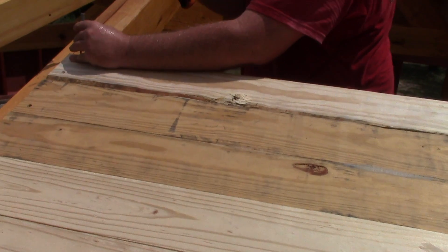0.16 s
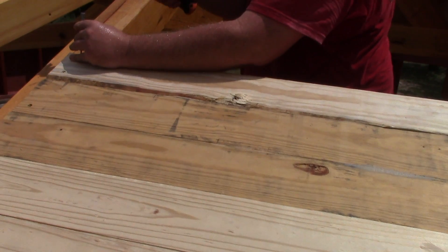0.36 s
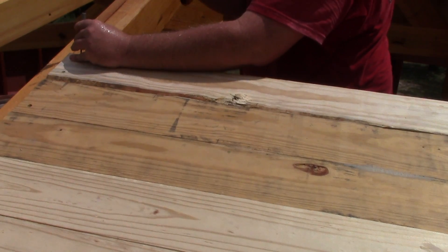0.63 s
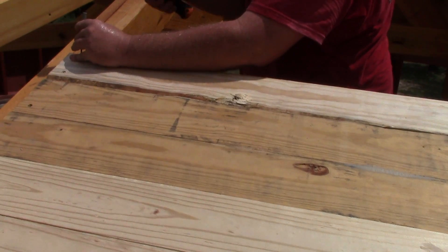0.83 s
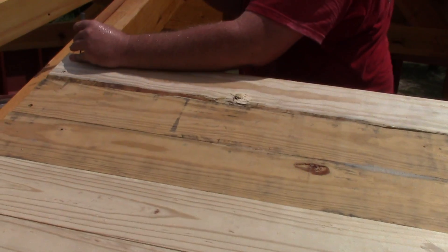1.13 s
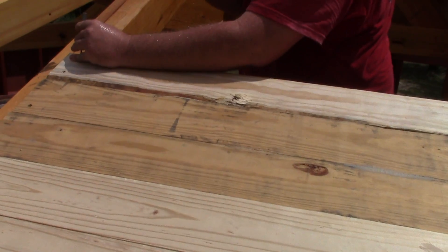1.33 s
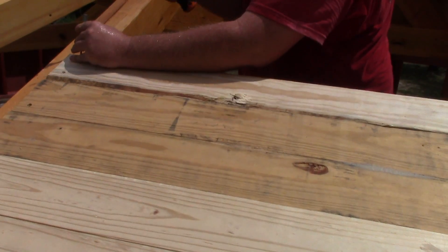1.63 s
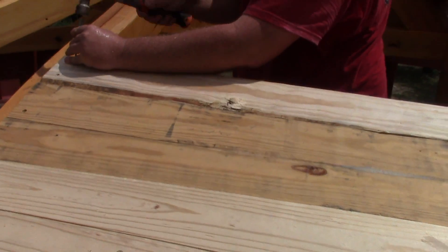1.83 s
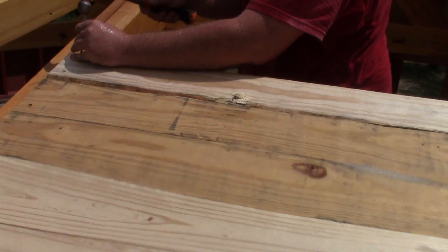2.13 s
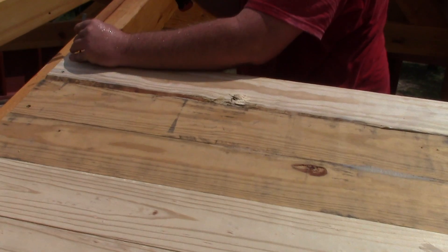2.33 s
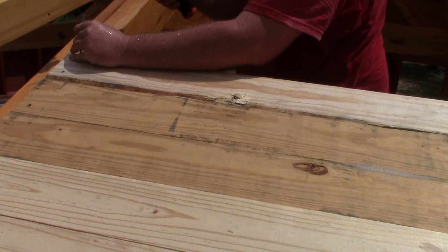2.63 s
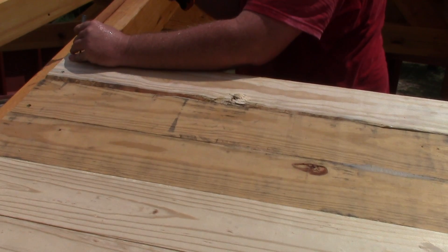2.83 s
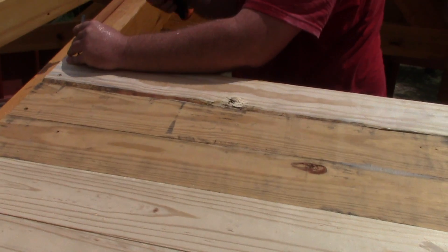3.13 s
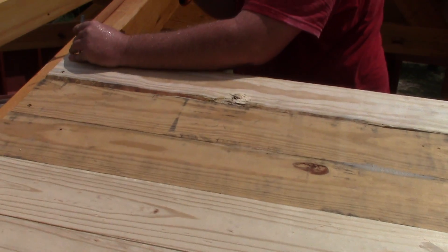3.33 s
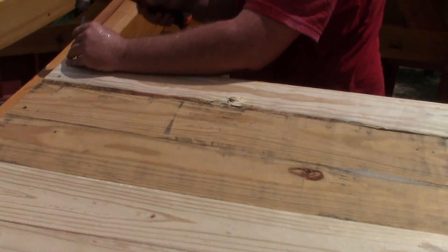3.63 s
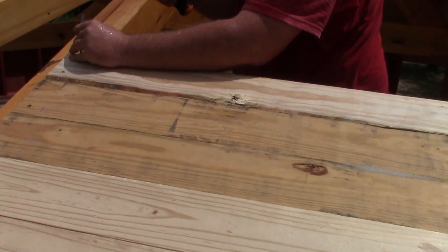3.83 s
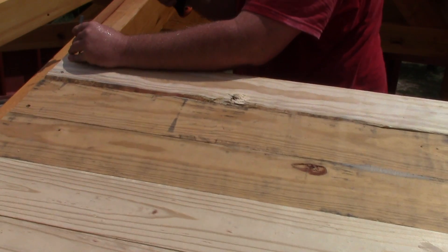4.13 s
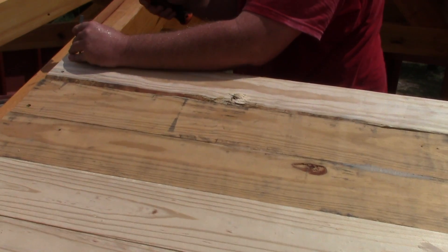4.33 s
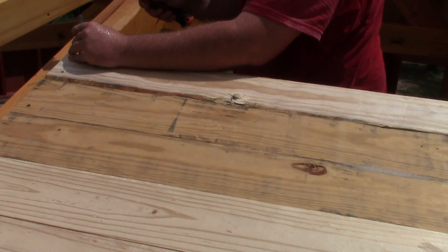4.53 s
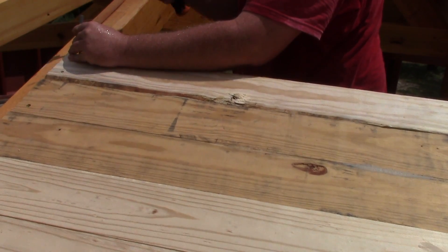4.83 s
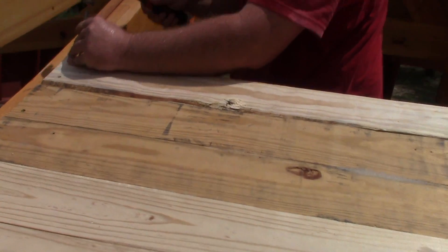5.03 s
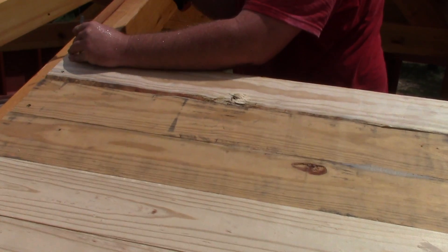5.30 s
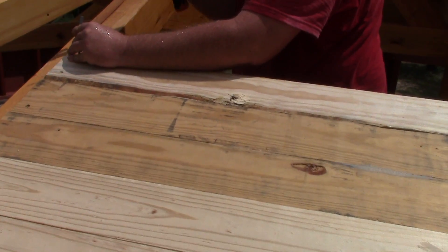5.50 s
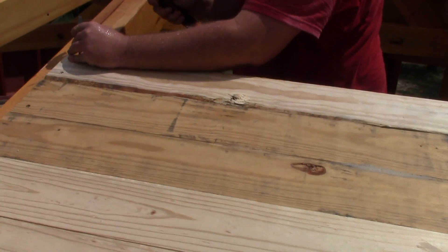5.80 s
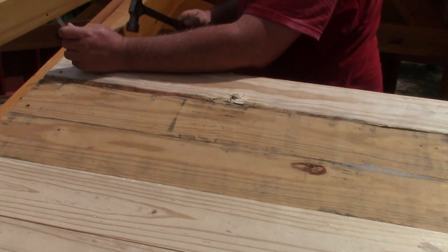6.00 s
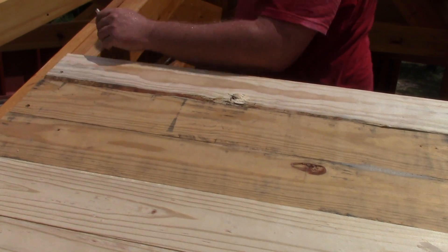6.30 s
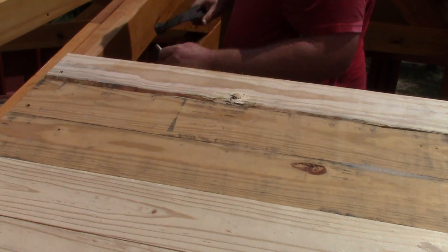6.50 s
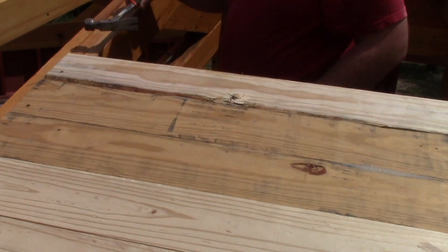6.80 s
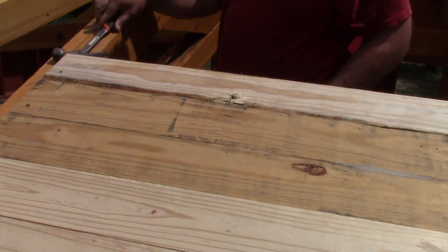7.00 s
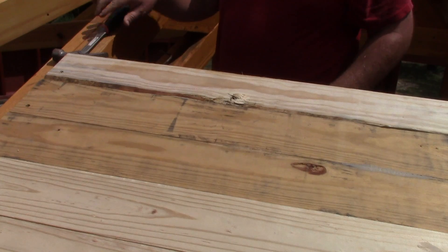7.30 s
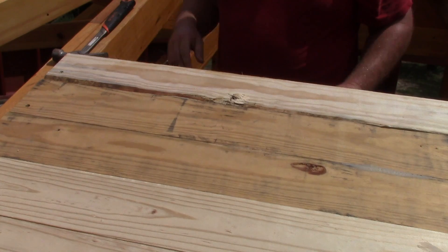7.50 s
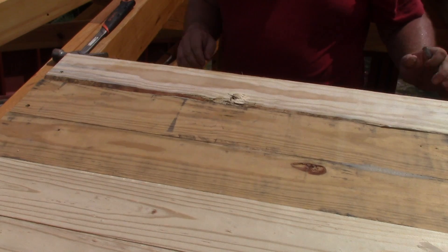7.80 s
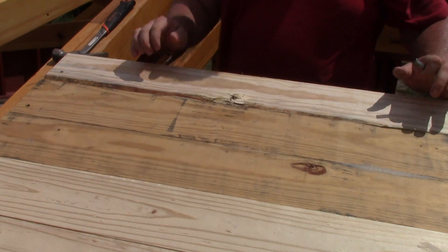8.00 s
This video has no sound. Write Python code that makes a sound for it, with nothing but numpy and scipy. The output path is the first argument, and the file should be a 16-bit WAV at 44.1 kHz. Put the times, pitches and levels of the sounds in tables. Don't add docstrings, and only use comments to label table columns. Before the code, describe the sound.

Outdoors on a wooden roof deck, close stereo microphone. A hammer blow is already ringing at the start, with a small double knock at 0.28. Hard, overloaded blows land at 0.9 and 1.5, a quick follow-up at 1.85 and a duller one at 2.15: sharp crack, hollow plank boom around 400-500 Hz, rough echoes, and a wavering steel ring at 5-7 kHz. Sound dips just after the loud hits. Light ticks come near 2.5, weaker blows at 3.05 and 3.65, a faint touch at 4.7, light blows at 5.05 and 5.7. Cicadas hiss left of centre, throbbing about 20-30 times a second, buzzier from 4 to 5.5, fading as the overall level sinks after 6, then rising abruptly at 7.74. Bird whistles: a falling one at 0.7, a rising one at 1.15, faint ones from 5.9, a rising series from 7.1 to 7.8, a chip at 8. Soft knocks at 7 and a brighter click near 7.8. Low site hum underneath.

```python
import sys
import numpy as np
from scipy import signal
from scipy.fft import rfft, irfft
from scipy.io import wavfile

SR = 44100
rng = np.random.default_rng(int(sys.argv[2]) if len(sys.argv) > 2 else 0)


def dump_mix(stems):
    frames = np.atleast_2d(stems).T
    limited = np.clip(frames, -1, 1)
    pcm = np.round(limited * 32767).astype(np.int16)
    wavfile.write(sys.argv[1], SR, pcm)


def undo_db(level):
    steps = np.asarray(level, float) / 20
    return 10 ** steps


N = 359415

# t/s, plank boom level/dB, echo level/dB, gain dip after the overload/dB
BLOWS = [
    (-.042, -15, -14, 15.5),
    (.8900, -10.5, -12.5, 13),
    (1.5096, -11, -11, 12),
    (1.844, -12.5, -15, 5.5),
    (2.1680, -19, -15.5, 10.5),
    (3.0562, -20.5, -21, -2.5),
    (3.649, -23.5, -25, -5),
    (4.7286, -43.5, -53.5, -0.5),
    (5.0515, -27, -30.5, -3.5),
    (5.6705, -36.5, -35, -4),
]
# thud level/dB, joist level/dB, nail level/dB, sizzle level/dB
LANDINGS = [(14, 4.5, 4, 3.5), (16, 5, 6, -2), (11, 3, -0.5, -0.5), (6, 1.5, 3.5, -2.5), (15, 5, 8.5, -4),
            (13.5, 1.5, 6, -2.5), (-4, -17, -14.5, -25.5), (13.5, 1.4, 1.5, 0.8), (7.5, -1.5, 3, -0.5)]
# f/Hz, t60/s
CONTACT_MODES = [
    [(330, 0.014), (452, .06), (560, 0.028)],
    [(1200, 0.0087), (1380, 0.0082)],
    [(1800, .018)],
    [(2560, 0.0091), (2830, .009), (3100, 0.011), (3800, 0.0055)],
    [(4600, 0.006), (9050, 0.0027)],
]
# f/Hz, level/dB, t60/s
PLANK_MODES = [(128.6, -28.5, 0.6), (189, -26.5, 0.77), (214.6, -17, 0.55), (244, -13.5, 0.57),
               (325, -6.5, 0.36), (376.6, -11.5, .4), (429.6, -2, 0.25), (456, -9, 0.34), (480.3, 0, 0.34),
               (526, -3, 0.2), (573.5, -19, 0.19), (605, -9.5, 0.6), (691, -13, 0.37), (773, -14, 0.61),
               (925, -5.5, .25)]
# f/Hz, level/dB per Hz
ECHO_SPECTRUM = [(60, -39), (200, -16), (380, -10.5), (460, -1), (700, -16), (980, -18.5), (1200, -9),
                 (1500, -13), (1850, -11.5), (2600, -13), (4000, -19.5), (7000, -13), (11000, -27.5),
                 (15500, -46)]
# f/Hz, t60/s
ECHO_T60 = [(100, 0.35), (400, 0.57), (1500, 0.55), (3000, 0.6), (7000, 0.17), (10000, 0.43), (15000, 0.13)]
# low mode level/dB, high mode level/dB, time the quiet side faces us t/s,
# share left at that moment/1, muffling at first/dB
RINGS = [(-3, -7.5, 0.0889, 0.3, 5), (-0.5, -16.5, .104, 0.2, 13), (-1, -6.5, 0.12, .5, 16),
         (-6.5, -11.5, .12, .4, 17), (-9, -22, .132, 0.3, 26), (-21, -25.5, 0.12, .6, 10),
         (-22.5, -17, .165, 0.5, 3.5), (-45, -67, .1, .7, 14), (-23.5, -18, .165, .3, 2.5),
         (-23.5, -26, 0.39, .9, 3)]
# t/s, level/dB, plank boom level/dB, f/Hz, width/Hz
TAPS = [(0.282, -21.5, -40, 1700, 500), (0.2807, -25, -56, 2815, 3000), (2.488, -35.5, -78, 1217, 500),
        (2.496, -29.5, -75, 1630, 700), (6.965, -42.5, -45.5, 1302, 600), (6.987, -43.5, -57, 1283, 600),
        (7.024, -59, -57, 1000, 600), (7.06, -63, -57.5, 1100, 700), (7.767, -36, -85, 3650, 900),
        (7.811, -48, -83, 1210, 120), (7.811, -41.5, -76, 2000, 900), (8.146, -64.5, -54.5, 894, 600)]
# f/Hz, level/dB per Hz
CICADA_SPECTRUM = [(710, -39), (1200, -21.5), (1310, -18.5), (1890, -16), (2450, -4), (2970, -4.5),
                   (4150, -4), (5090, -5), (5610, -7.5), (6740, -6.5), (8270, -7), (9520, -15),
                   (10700, -14), (12600, -26.5), (15800, -24)]
# f/Hz, width/Hz, level/dB
BODY_MODES = [(2740, 200, -3), (3100, 160, -5), (4190, 260, 0), (5150, 140, 1), (6800, 220, -1),
              (7500, 250, -4), (8650, 200, 1), (10400, 300, -8)]
# t/s, effort level/dB, throb depth/dB, buzz depth/1, left minus right level/dB
SONG = [(0, -1, 3.5, .2, 4), (.55, -1, 2.5, 0, 6.5), (1.098, -1, 1.5, .2, 10), (1.502, -6, .5, 0, 14),
        (1.8, 0.5, 1.5, .3, 7), (2.05, -5, 0, .3, 9.5), (2.518, -5.5, 2, 0.05, 7.5),
        (2.88, 5.5, 4.5, 0.3, 10), (3.04, 7.5, 4.5, .2, 10), (3.351, 1.5, 4.5, .3, 8),
        (3.619, 9.5, 5.5, .3, 10.5), (3.85, 1.5, 4.5, .3, 6), (4.029, 4.5, 3.5, 0.2, 6),
        (4.079, 5.5, 0, 0.7, 11), (5.02, 1, -2.5, 0.8, 9), (5.3, -3.5, -2, 0.38, 4), (6.2, 8, -3, .2, 8),
        (8.15, 9.5, -3, 0.02, 7.5)]
# t/s, throbs since the start/1
THROBS = [(0, 0), (.853, 21), (1.036, 26), (1.476, 37), (2.662, 77), (2.914, 87), (3.029, 91), (3.207, 96),
          (3.445, 102), (4.021, 115), (8.15, 205)]
# t/s, f/Hz
TYMBAL_RATE = [(0, 120), (4.1, 134), (4.7, 106), (5, 67), (8.15, 100)]
# t/s from the start of the call, f/Hz, level/dB
RISE = [(0, 1870, -32), (.025, 1810, -18), (.055, 1830, -15), (.068, 1900, -16), (.078, 2150, -7),
        (.095, 2400, -1), (.115, 2480, 0), (.14, 2440, -30)]
FALL = [(0, 6500, -30), (.04, 6150, -11), (.1, 5550, -10), (.135, 5000, -2), (.165, 4650, 0),
        (.205, 4460, -5), (.215, 4430, -30)]
NOTE = [(0, 3560, -25), (.012, 3500, -7), (.035, 3360, -3), (.07, 3320, 0), (.085, 3310, -28)]
CHIP = [(0, 3000, -28), (.008, 2870, -1), (.022, 2700, -3.5), (.03, 2623, -32)]
# t/s, level/dB, stretch in time/1
RISES = [
    (1.14, -37.5, 1.3),
    (7.09, -57.5, .95),
    (7.325, -55.5, 1.1),
    (7.568, -53.5, 1.09),
    (7.80, -41, 1.16),
]
FALLS = [
    (.70, -43, 1.02),
    (5.885, -66.5, 1.01),
    (6.65, -66, 1.01),
]
NOTES = [
    (6.128, -61.5, 1.01),
    (6.878, -68, 0.76),
]
CHIPS = [
    (8.02, -45.5, 1.01),
]
# f/Hz, level/dB per Hz
SITE_SPECTRUM = [(25, -27), (100, -29.5), (220, -19), (450, -10.5), (800, -18), (1250, -15.5), (1800, -13),
                 (2400, -27), (4000, -100)]
# t/s, level/dB
BACKGROUND_LEVEL = [(0, 2), (.88, 0), (1.45, 1.5), (2.1, -4.5), (2.6, -4), (3.4, -6), (4.3, -13), (5.0, -13),
                    (5.45, -14.5), (6.2, -31.5), (6.7, -34.5), (7.739, -28.5), (7.742, -15), (8.15, -14)]

BLOW_PAN_DB, UPPER_JOIST_DB = 3.3, -2.5
HEAD_HZ, HEAD_T60_S, SWING_AWAY_S, LOBE_TURN = (5121, 6870), (.43, .26), (.45, .17), (1, 0.62)
TURN_S, MUFFLED_S = 0.025, 0.025
LOUD_SIDE_DB, LOUD_AFTER_S, LOUD_S = 5, .038, 0.033
CHORUS_DB, NEAR_DB, SITE_DB = -48, 3, -53


def hammer():
    out = np.zeros((2, N))
    t = np.arange(32768) / SR
    for (s, *_), (thud_db, joist_db, *steel_db) in zip(BLOWS[1:], LANDINGS):
        colour_db = [thud_db - 23, joist_db, joist_db + UPPER_JOIST_DB, *steel_db]
        add(out, s, pan(BLOW_PAN_DB) * undo_db(-2.0) * crack(colour_db))
    for s, boom_db, echo_db, dip_db in BLOWS:
        duck_db = -dip_db * np.exp(-((t - .022) / 0.022) ** 2)
        planks = undo_db(0.75 * duck_db) * boom(t, boom_db)
        returns = undo_db(echo_db + duck_db) * echoes(t)
        add(out, s, pan(BLOW_PAN_DB) * (planks + returns))
    return out


def crack(colour_db):
    t = np.arange(2048) / SR
    sizzle_db = max(colour_db[-1], colour_db[-2] - 26.0) + 3
    sizzle = hiss([(1500, -19.0), (5000, -6.0), (9500, 1.5), (16000, -20)], len(t), 0.28)
    out = undo_db(sizzle_db) * sizzle * t / 0.0015 * np.exp(-t / .0012)
    for modes, db in zip(CONTACT_MODES, colour_db):
        for hz, t60 in modes:
            phase = rng.random() + .045 * rng.standard_normal((2, 1))
            out = out + undo_db(db + 6.5 - 60 * t / t60) * np.sin(2 * np.pi * (hz * t + phase))
    out = out * (1 - np.exp(-t / .0006)) ** 2
    bounce = 0.12 * np.roll(out, int(.0035 * SR), axis=1)
    return out + bounce


def boom(t, db, damping=1):
    hz, mode_db, t60 = np.tile(np.transpose(PLANK_MODES), reps=4)[:, :, None]
    level_chance, pitch_chance, phase_chance = rng.standard_normal((3, len(hz), 1))
    decay = undo_db(mode_db + 1.6 * level_chance) * np.exp(-np.log(1000) * damping * t / t60)
    rings = decay * np.sin(2 * np.pi * hz * (1 + .055 * pitch_chance) * t + .8 * phase_chance)
    onset = 1 - np.exp(-t / 0.0053)
    return undo_db(db - 6.5) * rings.sum(axis=0) * onset


def echoes(t):
    spectrum = rfft(hiss(ECHO_SPECTRUM, len(t), 0.74))
    f = np.fft.rfftfreq(len(t), 1 / SR)
    out = 0
    for hz in 60 * 2 ** np.arange(0, 8.6, .5):
        share = np.clip(1 - 2 * abs(np.log2(np.maximum(f, 1) / hz)), 0, 1)
        lumps_db = 2.8 * np.interp(t, np.arange(64) * .014, rng.standard_normal(64))
        decay_db = -60 * t / along(ECHO_T60, hz)
        out = out + irfft(spectrum * share, len(t)) * undo_db(lumps_db + decay_db)
    return out * (1 - np.exp(-t / 0.00074))


def head_ring():
    out = np.zeros((2, N))
    t = np.arange(20000) / SR
    for (s, *_), (low_db, high_db, quiet_s, left, muffle_db) in zip(BLOWS, RINGS):
        modes = zip(HEAD_HZ, (low_db, high_db), HEAD_T60_S, SWING_AWAY_S, LOBE_TURN)
        for hz, db, t60, away_s, turn in modes:
            muffling = np.exp(-(t / MUFFLED_S) ** 2 * 12 / max(muffle_db, 1))
            loud_side = np.exp(-((t / turn - quiet_s - LOUD_AFTER_S) / LOUD_S) ** 2)
            swing_db = -turn * muffle_db * muffling - 10 * (t / away_s) ** 2
            swing_db = swing_db + LOUD_SIDE_DB * min(muffle_db / 12, 1) * loud_side
            node_s = turn * quiet_s * np.array([[.97], [1.03]])
            lobe = np.tanh((t - node_s) / (turn * TURN_S))
            phase = 2 * np.pi * hz * t + np.array([[0], [.3]])
            tone = np.sqrt(1 - min(left, 1) ** 2) * lobe * np.sin(phase) + left * np.cos(phase)
            onset = np.minimum(t / 0.0043, 1)
            add(out, s, pan(2.2) * undo_db(db + swing_db - 60 * t / t60) * onset * tone)
    return out


def taps():
    out = np.zeros((2, N))
    t = np.arange(8192) / SR
    for s, db, boom_db, hz, width_hz in TAPS:
        click = rng.standard_normal(len(t)) * np.exp(-t / 0.00069)
        click = resonate(resonate(click, hz, width_hz), hz, width_hz)
        click = undo_db(db) * click / abs(click).max()
        planks = resonate(boom(t, boom_db, 2.8), 420, 250)
        add(out, s, pan(4.2) * (click + planks))
    return out


def bird():
    out = np.zeros((2, N))
    for shape, calls in ((RISE, RISES), (FALL, FALLS), (NOTE, NOTES), (CHIP, CHIPS)):
        s, hz, db = np.transpose(shape)
        for start, call_db, stretch in calls:
            t = np.arange(int(s[-1] * stretch * SR)) / SR / stretch
            phase = 2 * np.pi * np.cumsum(np.interp(t, s, hz)) / SR
            tone = undo_db(np.interp(t, s, db)) * np.sin(phase)
            add(out, start, pan(1.5) * undo_db(call_db) * tone)
            add(out, start + 0.018, pan(-7) * undo_db(call_db - 8.5) * tone)
    return out


def cicadas():
    t = np.arange(N) / SR
    s, effort_db, *columns = np.transpose(SONG)
    db = CHORUS_DB + background_level_db(t) + np.interp(t, s, effort_db)
    throb_db, buzz, pan_db = (np.clip(np.interp(t, s, c), 0, None) for c in columns)
    throb = np.cos(2 * np.pi * np.interp(t, *np.transpose(THROBS)))
    cycle = np.cumsum(np.interp(t, *np.transpose(TYMBAL_RATE))) / SR % 1
    clicks = np.exp(-cycle / 0.22) + .8 * np.exp(-((cycle - .42) % 1) / 0.19)
    depth = np.minimum(buzz, 1)
    air = (1 + depth * (clicks / clicks.mean() - 1)) * hiss(CICADA_SPECTRUM, N, 0.62)
    body = sum(undo_db(peak_db) * resonate(air, hz, width_hz) for hz, width_hz, peak_db in BODY_MODES)
    near = (1 - .6 * depth) * air + undo_db(4) * buzz * body
    near = near * undo_db(db + NEAR_DB + throb_db * throb) * pan(pan_db)
    far = undo_db(db + 3.5 - .5 * throb_db) * hiss(CICADA_SPECTRUM, N, 0)
    return near + far


def site():
    return undo_db(SITE_DB + background_level_db(np.arange(N) / SR)) * hiss(SITE_SPECTRUM, N, .2)


def background_level_db(t):
    return np.interp(t, *np.transpose(BACKGROUND_LEVEL))


def hiss(table, size, alike):
    mid, side = rng.standard_normal((2, size))
    both = np.sqrt(1 + alike) * mid + np.sqrt(1 - alike) * side * np.array([[1], [-1]])
    colour = undo_db(along(table, np.fft.rfftfreq(size, 1 / SR)))
    return level(irfft(rfft(both) * colour, size), 0)


def resonate(x, hz, width_hz):
    return signal.lfilter(*signal.iirpeak(hz, hz / width_hz, fs=SR), x)


def along(table, hz):
    f, v = np.transpose(table)
    return np.interp(np.log(np.maximum(hz, 1)), np.log(f), v)


def level(x, db):
    return x * undo_db(db) / np.sqrt(np.mean(x ** 2))


def pan(db):
    return undo_db(np.array([np.atleast_1d(db), -np.atleast_1d(db)]) / 2)


def add(out, s, x):
    i = int(round(s * SR))
    x = x[:, max(-i, 0):N - i]
    out[:, max(i, 0):max(i, 0) + x.shape[1]] += x


def scene():
    return hammer() + head_ring() + taps() + bird() + cicadas() + site()


def roll_off(x):
    return signal.sosfilt(signal.butter(12, 16030, fs=SR, output="sos"), x)


def record(dry):
    mix = np.clip(dry, -1, 1)
    return roll_off(mix)


dry = scene()
out = record(dry)
dump_mix(out)
```